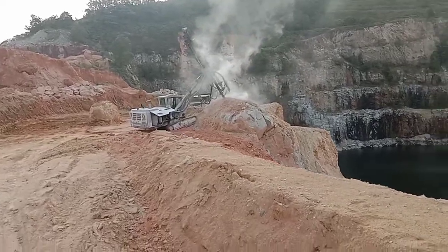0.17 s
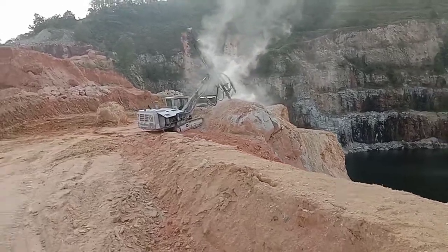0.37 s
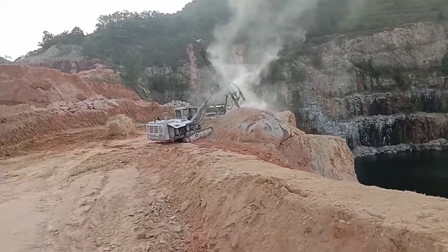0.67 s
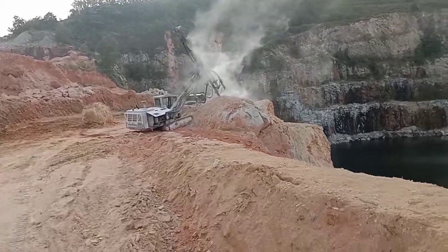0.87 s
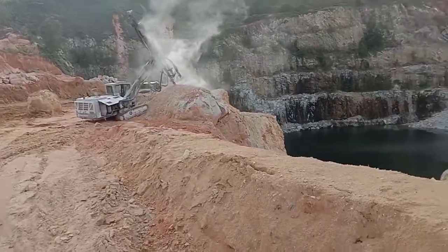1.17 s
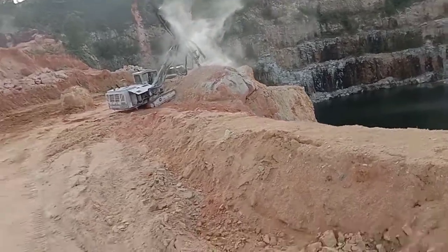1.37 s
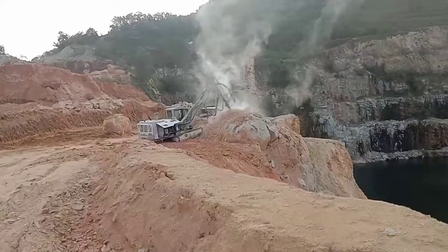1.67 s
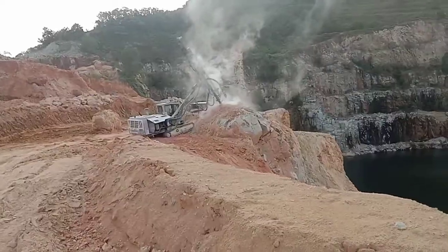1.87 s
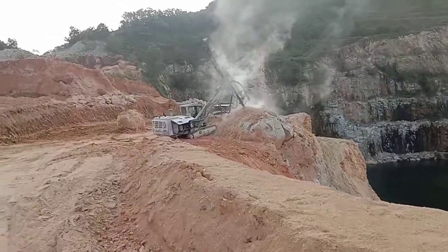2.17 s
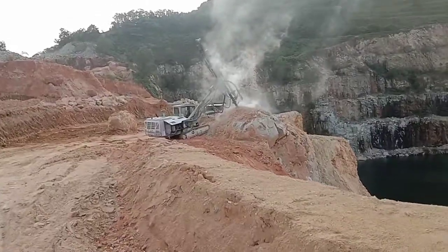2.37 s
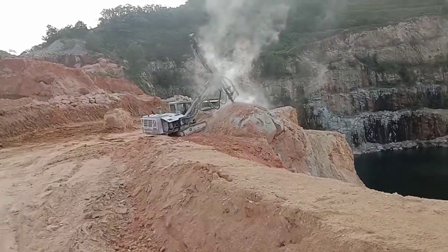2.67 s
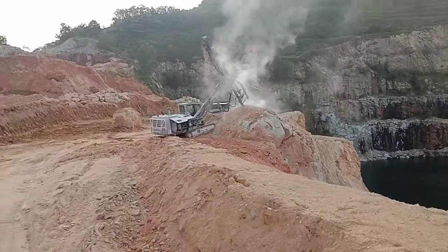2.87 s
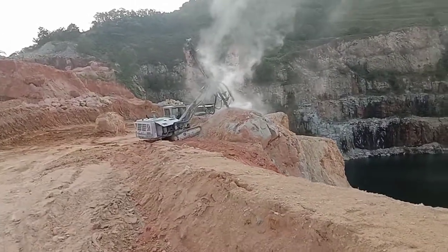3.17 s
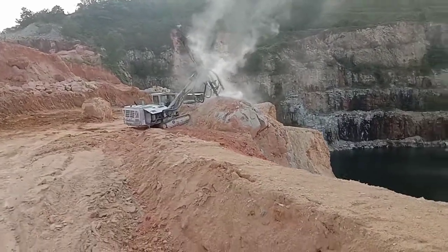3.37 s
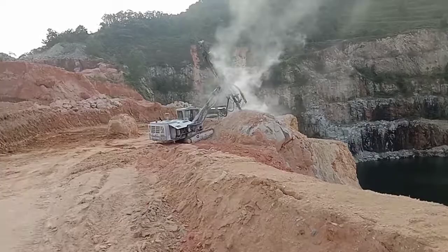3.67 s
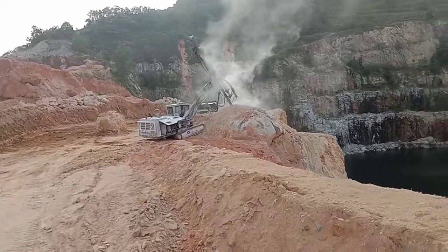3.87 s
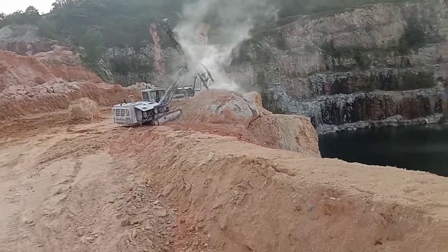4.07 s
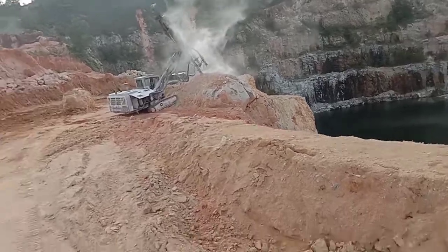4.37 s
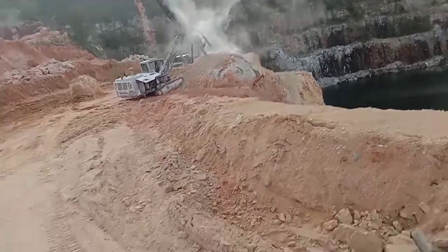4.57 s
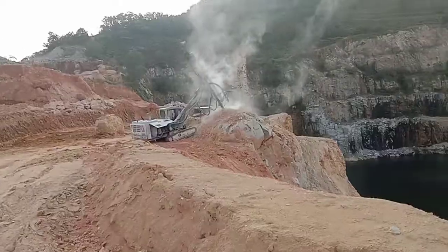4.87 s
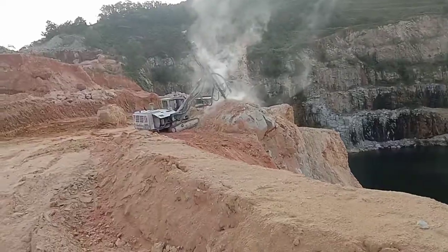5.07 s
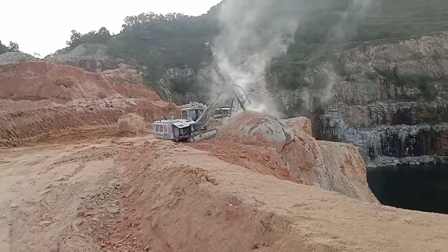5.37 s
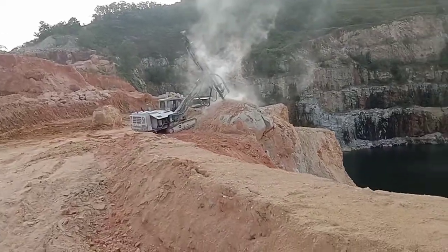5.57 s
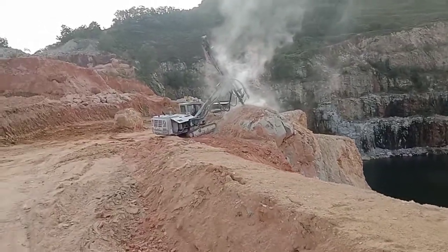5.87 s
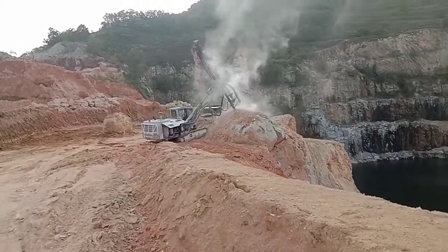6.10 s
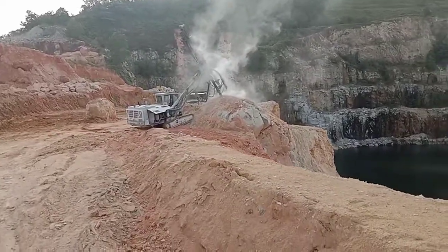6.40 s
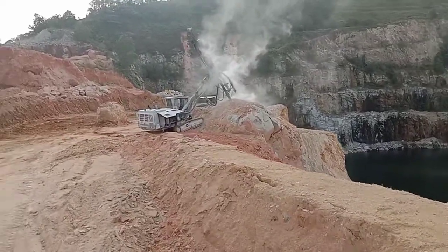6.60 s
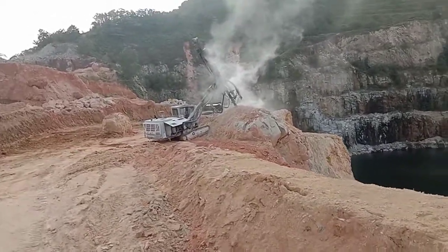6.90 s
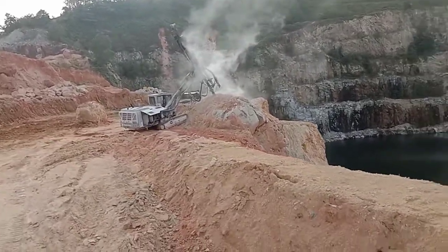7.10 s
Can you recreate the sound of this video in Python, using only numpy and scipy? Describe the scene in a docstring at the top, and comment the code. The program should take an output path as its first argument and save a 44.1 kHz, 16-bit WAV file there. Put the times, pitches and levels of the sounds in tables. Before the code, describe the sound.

A diesel drill rig hammers rapidly into rock, its steel whining, broken by whistling bursts of air and dull thumps.

```python
"""A diesel roar and a fast rattle swell in, with dull thumps: a tracked rock drill works across a quarry.
Its hammer strikes about 36 times a second, ringing the feed beam, and the grinding bit excites the modes
of the long drill steel. About every three seconds a blast of flushing air hisses through the steel and
whistles in the hole; then the sound drops out for an instant and swells back, and the thumps follow."""
import sys
import numpy as np
from scipy import signal
from scipy.fft import rfft, irfft
from scipy.io import wavfile

SR = 44100
rng = np.random.default_rng(int(sys.argv[2]) if len(sys.argv) > 2 else 0)


def wrap_up_sound(samples):
    """Save the sound to the file named by the first command line argument, as 16-bit audio."""
    columns = np.atleast_2d(samples).T
    # keep every value between -1 and 1, then stretch to whole-number steps
    tamed = np.clip(columns, -1, 1)
    steps = np.round(tamed * 32767).astype(np.int16)
    wavfile.write(sys.argv[1], SR, steps)


N = 319284
TIME = np.arange(N) / SR
FREQ = np.maximum(np.fft.rfftfreq(N, 1 / SR), 1)
REPEAT_START_S, REPEAT_S = 1.53, 3.0698
CLOCK = (TIME - REPEAT_START_S) % REPEAT_S + REPEAT_START_S  # event times are read on this clock
BLAST_S, VALVE_RISE_S, CUT_S = 4.008, 0.04, 4.568  # the air valve opens; the sound cuts out


# Blow rate, slowing a little before the air comes: (time [s], rate [Hz])
BLOW_RATE = [(3.3, 36.22), (3.4, 35.35), (4.0, 35.35), (4.1, 35.95)]

def strokes(return_share, scatter_db, jitter_s=.0005):
    """Impulse train: each piston blow is followed, half a period on, by a weaker return stroke."""
    clock = TIME[TIME < REPEAT_S] + REPEAT_START_S
    periods = np.cumsum(np.interp(clock, *np.transpose(BLOW_RATE))) / SR
    halves = np.arange(2 / 3, periods[-1], .5)
    one_repeat = np.interp(halves, periods, clock)
    times = np.concatenate([one_repeat - REPEAT_S, one_repeat, one_repeat + REPEAT_S])
    size = np.tile(np.where(np.arange(len(halves)) % 2, return_share, 1), 3)
    jitter, scatter = rng.standard_normal((len(times), 2)).T
    size = size * undb(scatter_db * scatter)
    pulses, _ = np.histogram(times + jitter_s * jitter, N, (0, N / SR), weights=size)
    return unit(pulses)


# Response of the feed beam: (frequency [Hz], relative level [dB])
BEAM_RESPONSE = [(300, -24.5), (900, -29), (1120, -11), (1205, -1.5), (1265, 2), (1325, -2), (1420, -21),
                 (1900, -26.5), (7000, -72)]

def hammer():
    """Impact excitation: strokes ring the feed beam; noise fills the gaps as the quarry's reverberation."""
    blows = strokes(return_share=.7, scatter_db=1.3)
    return through(blows + .9 * noise(), colour(BEAM_RESPONSE))


def throb(decay_s):
    """Build-up and decay: the envelope, mean 1, of the energy each blow sends down the steel."""
    age = TIME[:SR // 10] / decay_s
    swell = signal.fftconvolve(strokes(return_share=0.24, scatter_db=3.0), age * np.exp(-age))[:N]
    return swell / np.mean(swell)


# Spectra of the grinding bit and the jingling couplings: (frequency [Hz], relative level [dB])
BIT_SPECTRUM = [(1000, -10), (2000, -4), (2700, -7), (3300, -11), (3700, -5), (4200, 0), (5750, 1),
                (6250, -10), (7300, -15), (8000, -22), (11000, -23), (13800, -30)]
COUPLING_SPECTRUM = [(6000, -20), (8500, -2), (10600, 0), (11800, 0), (13500, -9), (15000, -8)]

def drill(grind, ring, sing):
    """Forced vibration: bit, couplings and air drive the steel; one mode sings, pulsed by the blows."""
    blows = throb(decay_s=0.005)
    scrape = through(noise() * (1 + 0.3 * blows) * undb(.5 * walk(25)), colour(BIT_SPECTRUM))
    jingle = through(noise() * (.25 + blows) * undb(.7 * walk(5)), colour(COUPLING_SPECTRUM))
    note = unit(tone(hz=3745, wander_hz=8, rough_db=1.3) * (1 + .8 * blows) * undb(2.1 * walk(25)))
    turn_s, peak_s = .37, 2.77  # the note swells once per turn of the steel
    turn = undb(4 * np.cos(2 * np.pi * (CLOCK - peak_s) / turn_s))
    drive = grind * (scrape + undb(-18) * jingle) + flushing_air()
    return steel(drive, ring) + sing * turn * note


# Nearly evenly spaced modes of the steel: (frequency [Hz], bandwidth [Hz], nominal gain [dB])
STEEL_MODES = [(2230, 18, 10), (2454, 20, 7), (2692, 28, 9), (2940, 30, 7), (3478, 16, 16), (3746, 50, 5),
               (4016, 20, 14), (4288, 40, 13), (4608, 26, 6), (4898, 20, 10), (5188, 18, 10), (5470, 36, 9),
               (6332, 30, 7), (6650, 45, 10), (6956, 28, 9), (7288, 28, 11), (7958, 20, 8), (8656, 25, 7),
               (9345, 20, 8), (9690, 20, 7), (10002, 20, 8), (11284, 25, 11), (11625, 40, 9),
               (11830, 50, 6), (14556, 35, 8)]

def steel(drive, ring, groups=5):
    """Modal superposition: damped resonances add to the drive, in groups that swell and fade at random."""
    spectrum, out = rfft(drive), drive
    for k in range(groups):
        modes = sum((undb(db) - 1) * resonance(hz, width) for hz, width, db in STEEL_MODES[k::groups])
        out = out + ring * undb(.6 + 1.5 * walk(6)) * irfft(spectrum * modes, N)
    return out


# Spectra of air in the steel and at the nozzle: (frequency [Hz], relative level [dB])
RUSH_SPECTRUM = [(600, -31), (1200, 6.5), (1700, 5.5), (2500, 3.5), (3400, -2), (4200, -7.5), (4800, -30),
                 (7000, -26), (12000, -20.5)]
NOZZLE_SPECTRUM = [(2500, -10), (4000, 3), (4500, -3), (5700, 1), (6300, -4), (7400, -3), (8000, -7),
                   (9700, -9), (15000, -9)]

def flushing_air():
    """Turbulent flow: air leaks, bursts from the nozzle, rushes down the steel and whistles in the hole."""
    leak = ramp(3.5, 0.053)
    valve = ramp(BLAST_S, VALVE_RISE_S)
    growth = undb(1.5 * ramp(BLAST_S, CUT_S - BLAST_S))
    peak_s, half_width_s = 4.297, .16  # the whistle arches in level and pitch
    off_peak = np.minimum(((CLOCK - peak_s) / half_width_s) ** 2, 10)
    arch = np.exp(-off_peak)
    whistle_hz = 3160 - 94.8 * off_peak
    # random amplitude and pitch spread the whistle into a hoarse, narrow band
    whistle = unit(walk(120) * np.sin(2 * np.pi * np.cumsum(whistle_hz + 45 * walk(120)) / SR))
    rush = through(noise() * undb(2.4 * walk(57)), colour(RUSH_SPECTRUM))
    hiss = through(noise() * undb(1.1 * walk(54)), colour(NOZZLE_SPECTRUM))
    rush_gain = undb(-25.5 - 3 * arch) * ramp(BLAST_S, .11) * growth  # yields to the whistle
    hiss_gain = undb(-49.5) * leak + undb(-34.5) * valve * growth
    return rush_gain * rush + hiss_gain * hiss + undb(-23) * valve * arch * whistle


# Spectrum of exhaust and fan: (frequency [Hz], relative level [dB])
ROAR_SPECTRUM = [(25, -17), (45, -20.5), (68, -13), (100, 0), (140, 1), (230, -1), (300, -3.5), (400, -4.5),
                 (620, -10), (770, -9.5), (1000, -10), (1500, -16), (2000, -27), (7000, -61)]
# Steady machine tones, the hammer's low drone, then fan and pumps:
# (frequency [Hz], relative level [dB], wander [Hz])
MACHINE_TONES = [(72.1, -10, 6.94), (165.4, -11.5, 9.7), (255, -8.5, 5.1), (380.6, -14, 11.83),
                 (467, -11.5, 7.7), (557.6, -12.5, 1.99), (767, -17.5, 12), (1396, -24, 2.53)]

def engine(roar, hum):
    """Broadband and tonal noise: exhaust and fan roar under the firing note and the machine's tones."""
    rush = through(noise() * undb(0.71 * walk(39)), colour(ROAR_SPECTRUM))
    tones = sum(undb(db) * tone(hz, wander, rough_db=2.5) for hz, db, wander in MACHINE_TONES)
    firing = tone(hz=120.85, wander_hz=6.125, rough_db=1.5)
    return roar * (rush + undb(-3.5) * tones) + hum * firing


# Dull knocks: (time [s], level [dB], frequency [Hz], decay [s], signed click [ratio], beam ring [ratio])
KNOCKS = [(1.5553, -27, 180, .006, 2.2, .1), (2.0148, -11, 130, .004, 2.2, .1),
          (2.1008, -7.5, 88, .012, 3.0, .05), (4.1052, -4, 260, .003, -2.0, .5),
          (4.167, -9, 170, .007, 0.03, .02)]

def thumps(beam_hz=1320):
    """Damped free vibration: a sharp edge, a few low swings and a short ring of the beam."""
    out = np.zeros(N)
    for start_s, db, hz, decay_s, click, ring in KNOCKS:
        age = (TIME - start_s) % REPEAT_S
        attack = (1 - np.exp(-age / .00007)) ** 2
        edge = click * np.exp(-age / .0006)
        swing = np.sign(click) * np.sin(2 * np.pi * hz * age) * np.exp(-age / decay_s)
        beam = ring * np.sin(2 * np.pi * beam_hz * age) * np.exp(-age / 0.0052)
        out += undb(db) * attack * (edge - swing + beam)
    return out


def dropouts():
    """Amplitude modulation: each repeat swells in, dips briefly round a big thump and cuts out."""
    swell = ramp(1.539, 0.26) ** 1.15
    dip_s, hold_s, dip_db, floor_db = 2.082, 0.024, -9, -55.5
    dip = ramp(dip_s, 0.0028) - ramp(dip_s + hold_s, 0.028)
    cut = np.exp(-np.maximum(CLOCK - CUT_S, 0) / .0012)
    return swell * undb(dip_db * dip) * cut + undb(floor_db)


def tone(hz, wander_hz, rough_db):
    """Random modulation of a sinusoid's frequency and amplitude."""
    phase = np.cumsum(hz + wander_hz * walk(13.66)) / SR
    return unit(np.sin(2 * np.pi * phase) * undb(rough_db * walk(26)))


def resonance(hz, width):
    """Response of a damped oscillator, gain 1 at its centre."""
    return 1 / (1 + 1j * (FREQ ** 2 - hz ** 2) / (FREQ * width))


def colour(points):
    """Frequency response through (frequency [Hz], level [dB]) points."""
    hz, db = np.transpose(points)
    return undb(np.interp(np.log(FREQ), np.log(hz), db))


def through(x, response):
    """Linear filtering, scaled to rms 1."""
    return unit(irfft(rfft(x) * response, N))


def walk(rate):
    """Low-pass noise of spread 1, changing about rate times a second."""
    return through(noise(), np.exp(-(FREQ / rate) ** 2))


def noise():
    """White noise."""
    return rng.standard_normal(N)


def ramp(start_s, rise_s):
    """Linear rise from 0 to 1 in each repeat."""
    return np.clip((CLOCK - start_s) / rise_s, 0, 1)


def undb(db):
    """Decibels to gain."""
    return 10 ** (np.asarray(db) / 20)


def unit(x):
    """Normalisation to rms 1."""
    return x / np.std(x)


# Relative levels through one repeat of the sound: (time [s], engine hum [dB], hammer [dB], grinding [dB])
LAYER_LEVELS = [(1.8, -22, -26.5, -35.0), (2.13, -22.5, -26, -35.5), (2.4, -28.5, -22, -31.5),
                (2.66, -21.5, -28.5, -35), (3.1, -26, -22.5, -33.0), (3.42, -34.5, -25.0, -36),
                (3.62, -33, -24.0, -34.5), (3.98, -29, -24.5, -35)]

def scene():
    """Superposition: hammer, drill and engine share the drop-outs; the thumps sound on top."""
    times, *levels = np.transpose(LAYER_LEVELS)
    hum_db, hammer_db, grind_db = (np.interp(CLOCK, times, db) for db in levels)
    eased = ramp(3.22, .13)  # the hammer eases: more roar, less ring and song from the steel
    valve = ramp(BLAST_S, VALVE_RISE_S)  # the blast sets the steel singing again
    sink = ramp(4.036, 0.18)  # the machine's own sound sinks under the blast
    roar = undb(-22 + 1.2 * eased - 5.5 * sink)
    hum = undb(hum_db - 5.8 - 1.5 * sink + 2.5 * walk(10))
    rattle = undb(hammer_db - 3 - 0.8 * sink)
    grind = undb(grind_db - 4.5)
    ring = undb(-0.1 - 3.5 * (eased - valve))
    sing = undb(-41 - 8 * eased) + undb(-34.5) * valve
    rig = engine(roar, hum) + rattle * hammer() + drill(grind, ring, sing)
    return (dropouts() * rig + thumps())[None]


# Treble response of the microphone: (frequency [Hz], gain [dB])
MIC_RESPONSE = [(7400, 0), (8050, -8), (8800, 3), (9300, -3), (9850, -5), (10200, -1), (10550, 7),
                (10950, 0), (12900, 0), (13850, -4), (14550, 4), (15400, -2)]

def record(dry):
    """Band limiting: the microphone ripples the treble; the deepest bass and the very top are cut."""
    heard = irfft(rfft(dry) * colour(MIC_RESPONSE), N)
    heard = signal.sosfilt(signal.butter(2, 40, "high", fs=SR, output="sos"), heard)
    return signal.sosfilt(signal.ellip(12, .2, 80, 15450, fs=SR, output="sos"), heard)


dry = scene()
out = record(dry)
wrap_up_sound(out)
```